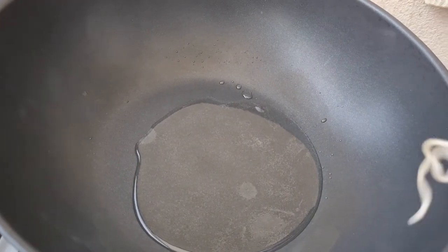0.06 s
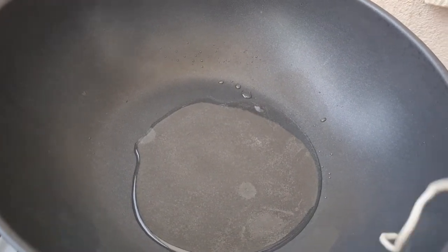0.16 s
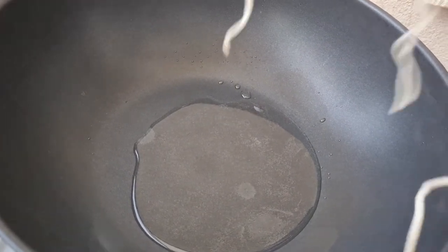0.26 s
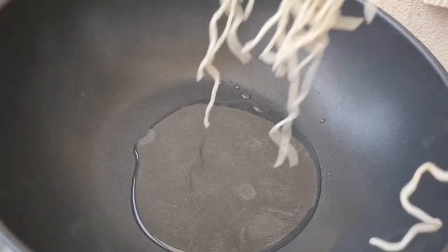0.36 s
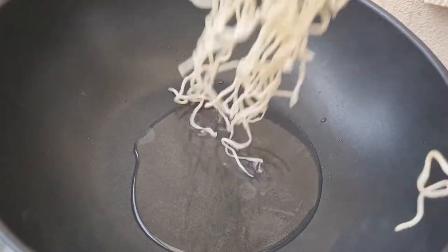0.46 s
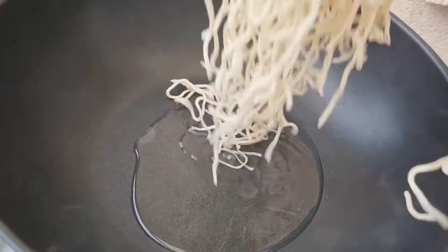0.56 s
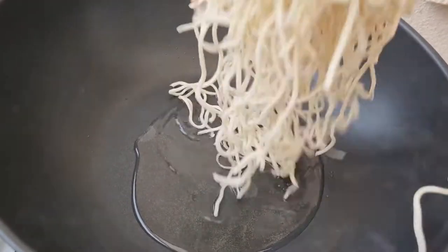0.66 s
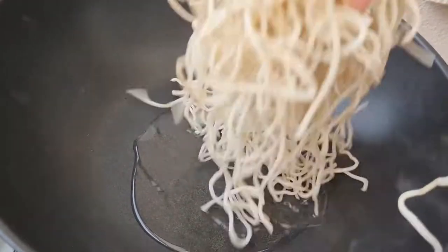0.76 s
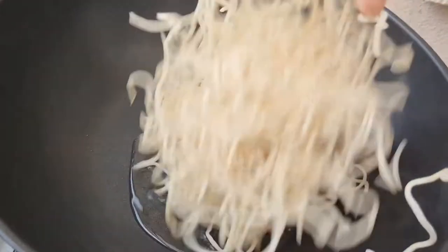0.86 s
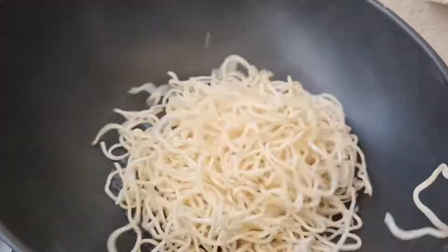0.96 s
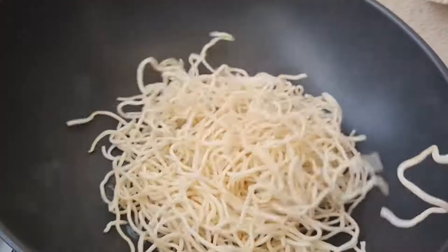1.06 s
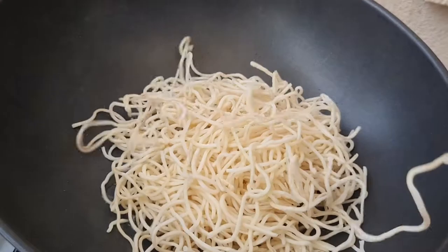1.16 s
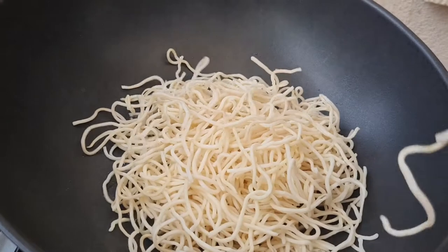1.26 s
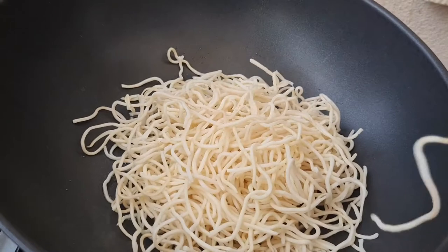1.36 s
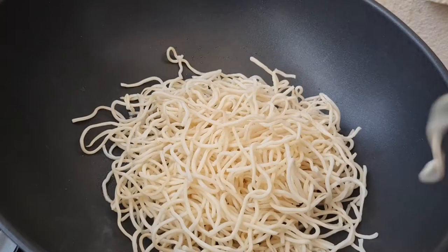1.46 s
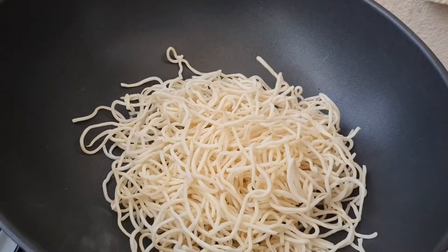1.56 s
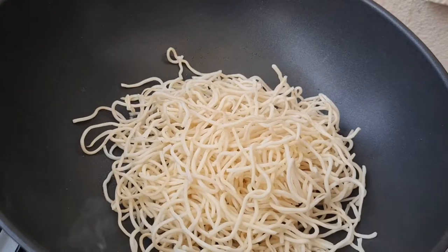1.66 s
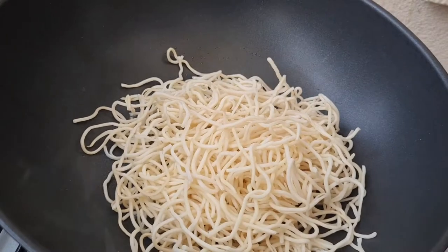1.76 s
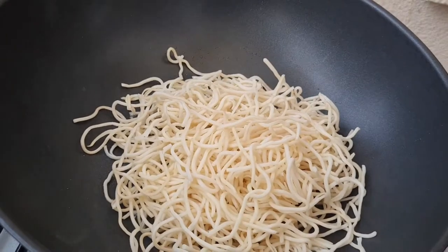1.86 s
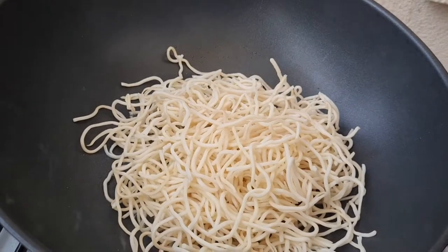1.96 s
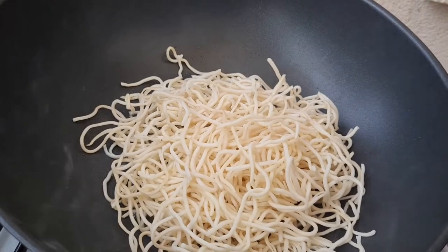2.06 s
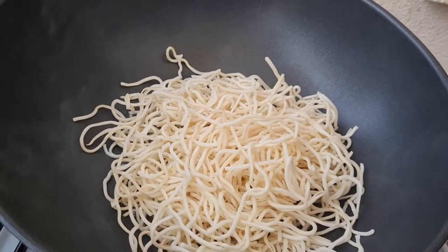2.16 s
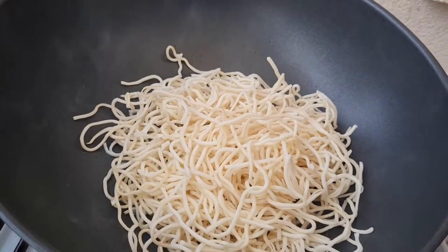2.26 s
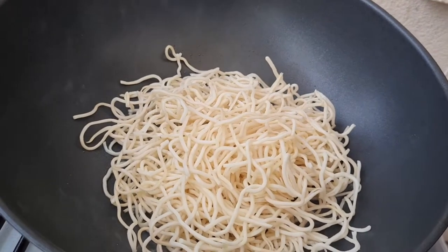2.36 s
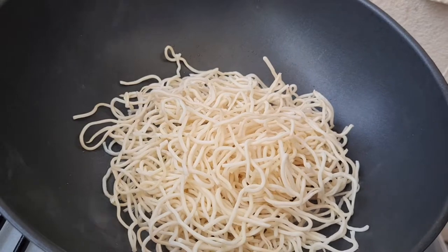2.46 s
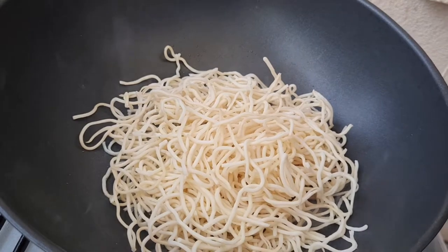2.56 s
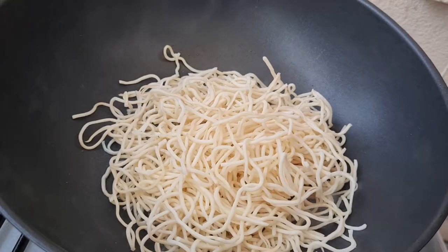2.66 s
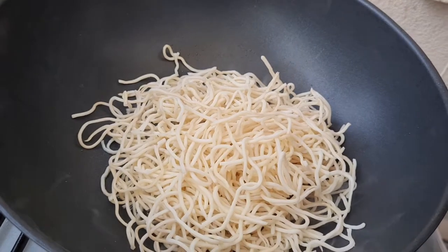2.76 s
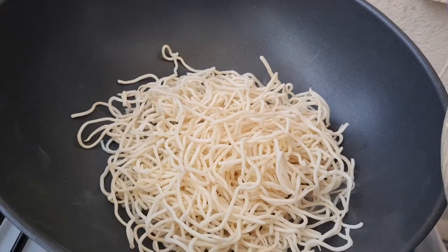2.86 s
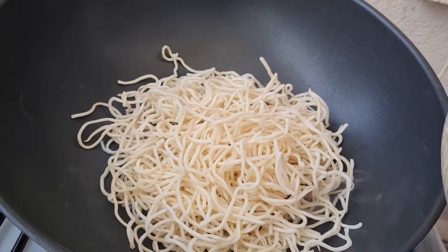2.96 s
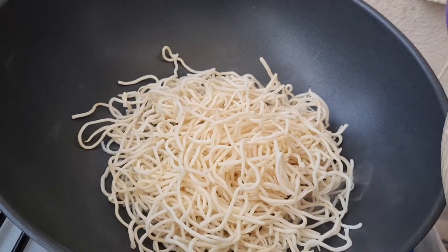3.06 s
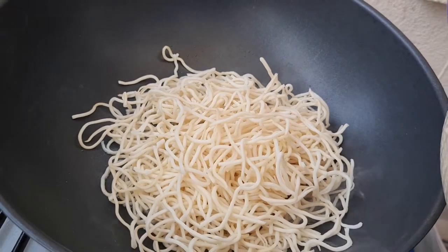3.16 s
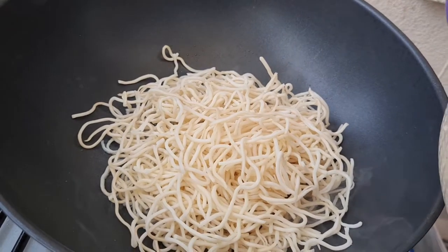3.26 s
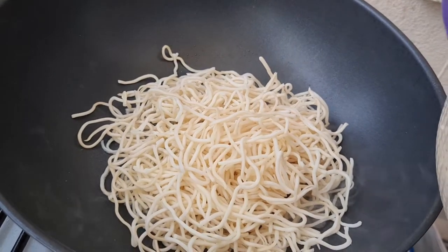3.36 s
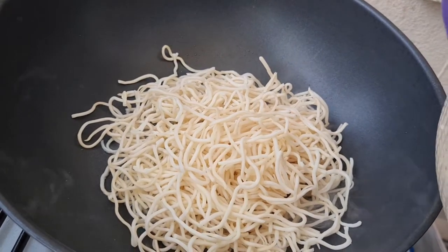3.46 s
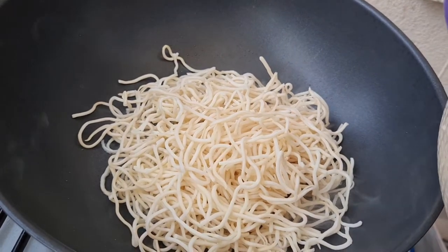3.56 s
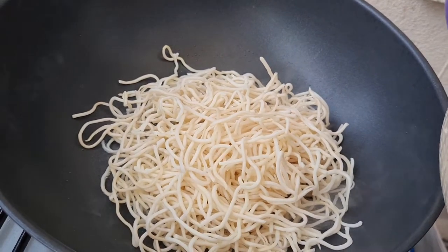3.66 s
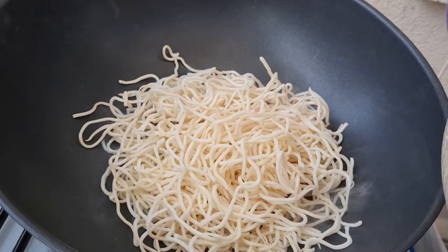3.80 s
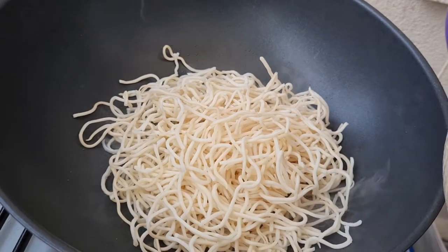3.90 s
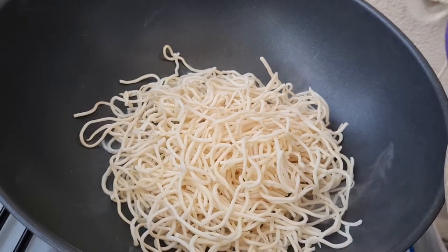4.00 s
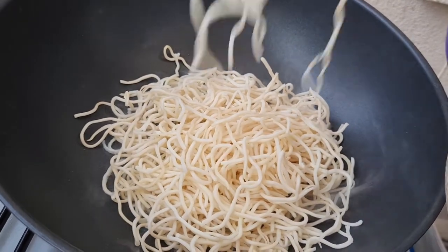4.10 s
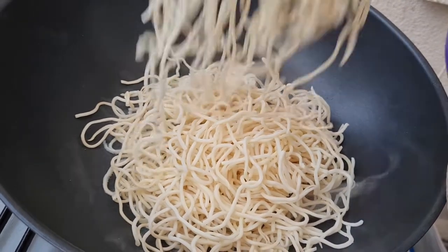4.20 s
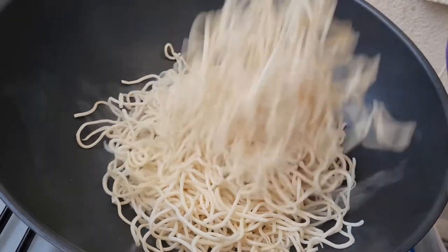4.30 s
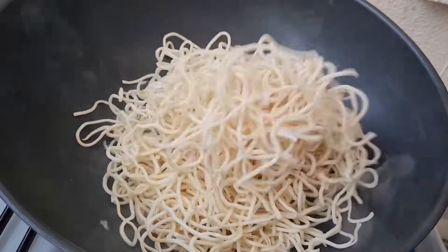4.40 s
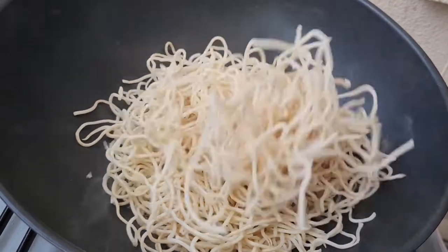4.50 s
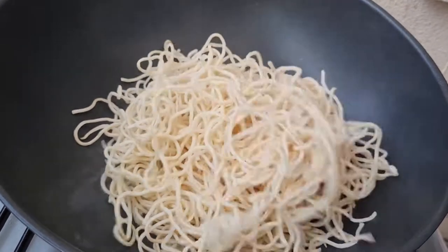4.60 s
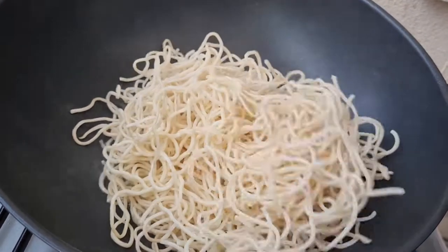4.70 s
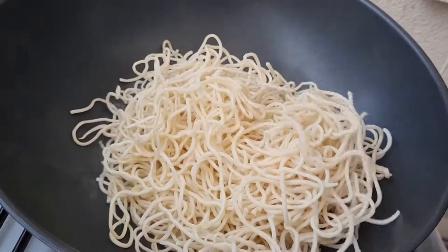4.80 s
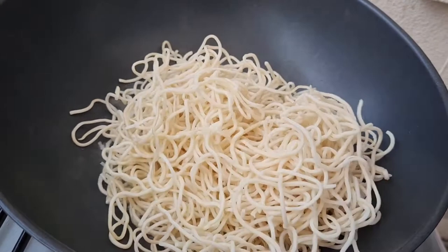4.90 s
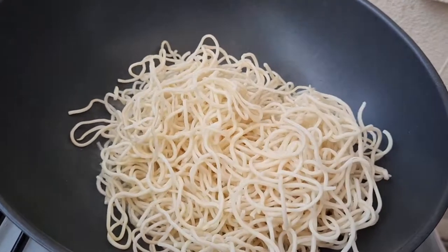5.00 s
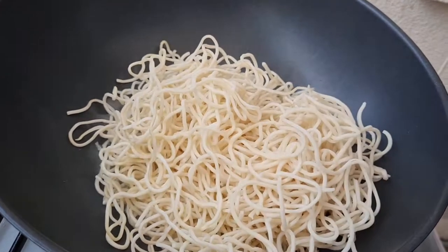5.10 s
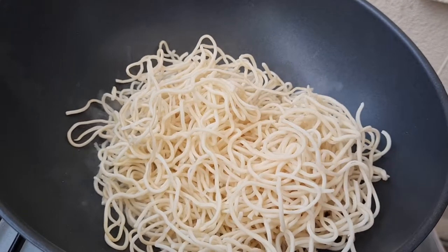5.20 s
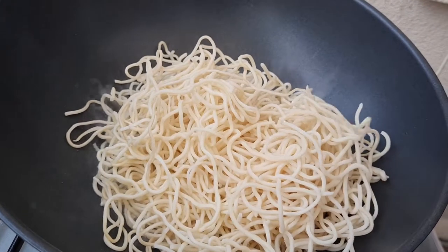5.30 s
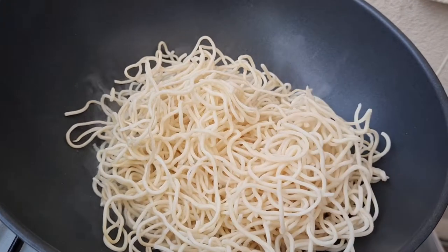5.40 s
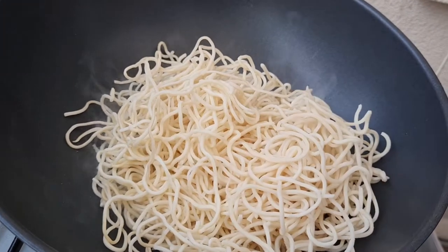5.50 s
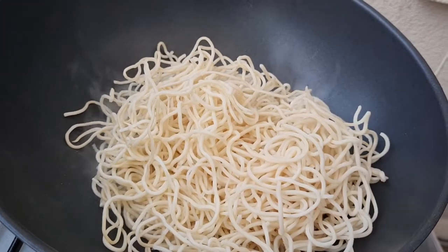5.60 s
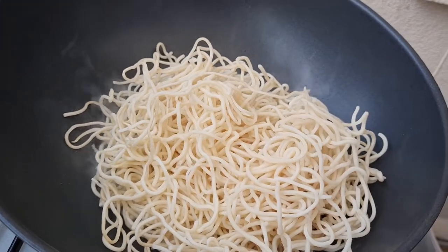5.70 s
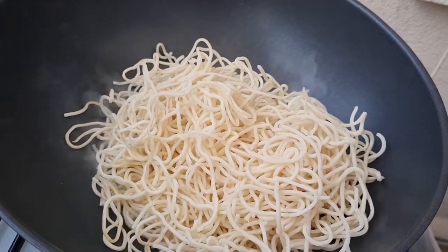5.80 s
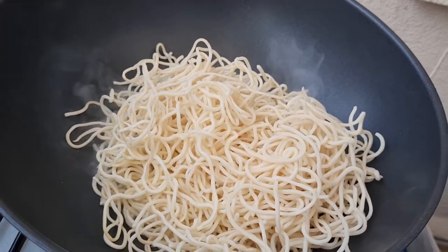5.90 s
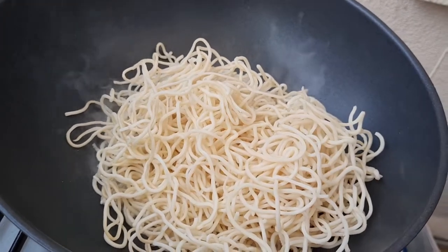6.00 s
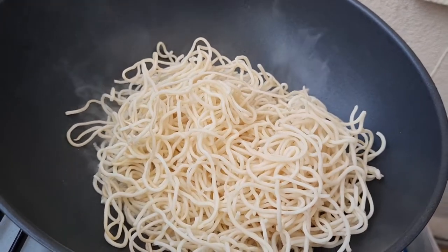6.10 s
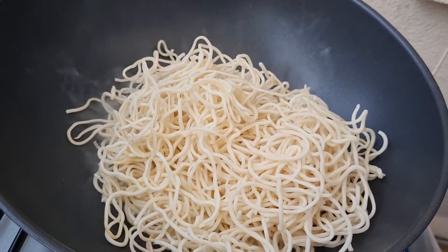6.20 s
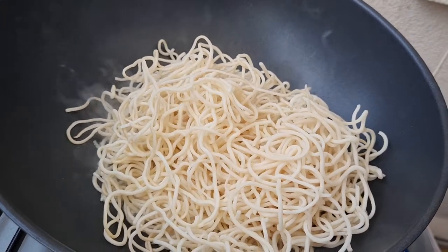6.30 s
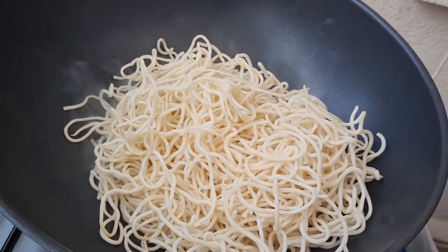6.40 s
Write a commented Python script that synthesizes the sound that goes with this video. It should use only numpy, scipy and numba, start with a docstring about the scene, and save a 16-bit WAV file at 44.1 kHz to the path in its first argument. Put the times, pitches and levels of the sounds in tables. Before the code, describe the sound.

Over the faint steady rush of a small kitchen, wet noodles rustle softly and land in a wok of hot oil with a sudden hiss. They settle into a bright, crackling sizzle with sharp spits of oil, small bubbling pops and brief squirts of steam. A second handful lands on top with soft wet slaps, and the sizzle swells a little and carries on. The microphone is close to the wok.

```python
"""Wet noodles fry in a wok, over the steady background rush of a small kitchen.
First the hanging strands rustle, and a brief soft hiss comes just before the landing.
Near 1 s they land in the hot oil and their water flashes to steam.
Then they fry: tiny steam bursts crackle, bubbles ring and pop under the heap, and the oil spits.
At 4.3 s a second handful lands on top and the sizzle swells; all along, the cooling oil dulls it."""
import sys
import numpy as np
from scipy import signal
from scipy.fft import rfft, irfft, next_fast_len
from scipy.io import wavfile
from numba import njit

SR = 44100
rng = np.random.default_rng(int(sys.argv[2]) if len(sys.argv) > 2 else 0)


def dump_mix(stems):
    """Bounce the given channels to the path in sys.argv[1] as a 16-bit WAV at rate SR."""
    frames = np.atleast_2d(stems).T  # one column per channel
    limited = np.clip(frames, -1, 1)  # hard clip at full scale
    pcm = np.round(limited * 32767).astype(np.int16)
    wavfile.write(sys.argv[1], SR, pcm)


N = 284445
TIME = np.arange(N) / SR


def from_db(db):
    """Amplitude ratio: tenfold for every 20 dB."""
    return 10 ** (np.asarray(db) / 20)


def rms_one(x):
    """Normalisation to unit mean power."""
    return x / np.sqrt(np.mean(x ** 2) + 1e-20)


def gain_at(spectrum, hz):
    """Frequency response, interpolated in dB over log frequency."""
    points_hz, db = np.transpose(spectrum)
    return from_db(np.interp(np.log(hz + 1e-9), np.log(points_hz), db))


def coloured(x, spectrum):
    """Zero-phase filtering: each frequency is scaled by the spectrum's gain."""
    size = np.shape(x)[-1]
    padded = next_fast_len(size, True)
    gain = gain_at(spectrum, np.fft.rfftfreq(padded, 1 / SR))
    return irfft(rfft(x, padded) * gain, padded)[..., :size]


def band(x, low_hz, high_hz):
    """Band-pass filtering between two edges."""
    sos = signal.butter(2, [low_hz, min(high_hz, SR / 2 - 1)], "band", fs=SR, output="sos")
    return signal.sosfilt(sos, x + 1e-18)


def drift(per_s):
    """Random modulation of rms 1: straight lines between Gaussian values."""
    points = rng.standard_normal(4096)
    return rms_one(np.interp(TIME * per_s, np.arange(len(points)), points))


def ring(drive, hz, cycles):
    """Damped resonance: the response falls by 60 dB in so many cycles."""
    radius = np.exp(-np.log(1000) * hz / (cycles * SR))
    angle = 2 * np.pi * hz / SR
    return signal.lfilter([.5, 0, -.5], [1, -2 * radius * np.cos(angle), radius ** 2], drive + 1e-18)


@njit
def bursts(starts, sizes, pitches, cycles, total):
    """Superposition of struck oscillators, each falling by 60 dB in so many cycles."""
    out = np.zeros(total)
    for k in range(len(starts)):
        length = cycles * SR / pitches[k]
        radius = np.exp(-np.log(1000.) / length)
        pull = 2 * radius * np.cos(2 * np.pi * pitches[k] / SR)
        last, before = sizes[k], 0.
        out[starts[k]] += last / 2
        for i in range(starts[k] + 1, min(starts[k] + int(length) + 3, total)):
            now = pull * last - radius * radius * before
            out[i] += (now - before) / 2
            last, before = now, last
    return out


def grains(spectrum, low_hz, high_hz, per_s, spread_db, largest_db, cycles):
    """Shot noise of rms 1: bursts at random times and pitches, many small and few large."""
    when, rank, sign, place = rng.random((int(per_s * N / SR), 4)).T
    db = np.minimum(-spread_db * np.log(1 - rank), largest_db)
    pitches = low_hz * (high_hz / low_hz) ** place
    sizes = from_db(db) * np.sign(sign - .5) * pitches * gain_at(spectrum, pitches)
    return rms_one(bursts((when * N).astype(np.int64), sizes, pitches, float(cycles), N))


def stereo_noise(spectrum, shared):
    """Partly coherent noise of rms 1: a share of its power is common to both sides."""
    common = np.sqrt(shared) * rng.standard_normal(N)
    own = np.sqrt(1 - shared) * rng.standard_normal((2, N))
    return rms_one(coloured(common + own, spectrum))


# Spectra of the steady noises. Each row: frequency in Hz, relative level in dB.
RUSH_SPECTRUM = [(25, -10), (52, -6), (85, -9), (130, -2.5), (185, -15.5), (240, -3), (400, -15.5),
                 (650, -3), (870, 4.5), (1130, -6.5), (1380, 2), (1720, -27.5), (2080, -22.5), (2800, -38)]
HISS_SPECTRUM = [(3000, -25), (3950, -19), (4400, -3.5), (5300, -2.5), (6400, -13), (7500, -7), (8370, -9),
                 (8850, -4.5), (9500, -16), (10300, -1), (11400, -15), (15500, -16)]
RUMBLE_SPECTRUM = [(25, -10), (42, 2), (52, 11.5), (64, 1), (76, 1.5), (95, -9), (118, 1), (170, -14.5),
                   (240, -25), (330, -28)]
# The rumble's envelope. Each row: time in seconds, relative level in dB.
RUMBLE_LEVELS = [(0, -82), (.8, -78), (1.6, -75.5), (3.6, -70.5), (4.1, -69), (5.0, -69.5), (5.4, -73),
                 (5.85, -65.5), (6.45, -75)]

def background():
    """Ambient noise, most coherent in the bass: an airy rush, a faint hiss and a rumble at the stove."""
    rush = from_db(-64.5) * stereo_noise(RUSH_SPECTRUM, shared=0.44) * from_db([[1.5], [-1.5]])
    hiss = from_db(-74) * stereo_noise(HISS_SPECTRUM, shared=0.051) * from_db([[2.5], [-2.5]])
    rumble_db = np.interp(TIME, *np.transpose(RUMBLE_LEVELS)) + 2.5
    return rush + hiss + from_db(rumble_db) * stereo_noise(RUMBLE_SPECTRUM, shared=0.86)


# Soft bumps. Each row: start in seconds, body level in dB, hold in seconds, body's upper edge in Hz.
LOW_THUDS = [(0.996, -59, 0.11, 332), (2.287, -54.5, 0.09, 148), (2.957, -56, 0.1, 168)]

def thuds():
    """Exponential decay of low noise: a rough edge fades at once, a dull body holds a moment first."""
    out = np.zeros(N)
    for start, db, hold_s, top_hz in LOW_THUDS:
        onset = np.clip((TIME - start) / 0.012, 0, 1)
        age = np.maximum(TIME - start, 0)
        release = np.exp(-np.maximum(age - hold_s, 0) / 0.085)
        body = release * rms_one(band(rng.standard_normal(N), 46, top_hz))
        edge = np.exp(-age / 0.036) * rms_one(band(rng.standard_normal(N), 220, 610))
        out += from_db(db) * onset * (body + from_db(2.5) * edge)
    return out


def reflections(t60, start_s):
    """Diffuse field: dying echoes of unit energy, different at each side except in the bass."""
    t = TIME[:SR // 3]
    own, common = rng.standard_normal((2, len(t))), rng.standard_normal(len(t))
    bass = signal.butter(1, 700, fs=SR)
    cloud = own - signal.lfilter(*bass, own) + signal.lfilter(*bass, common)
    cloud = cloud * np.exp(-np.log(1000) * t / t60) * (t > start_s)
    return cloud / np.linalg.norm(cloud, axis=1, keepdims=True)


# The left microphone faces the pan; the shaded right one hears mostly reflections, with this colour.
# Each row: frequency in Hz, gain in dB.
SHADE_RESPONSE = [(500, 0.5), (2000, 1.5), (5000, 2.5), (7600, 3.5), (8800, -4), (12000, -1.5),
                  (15500, -3.5)]

def heard(spot, echo_db=0):
    """Multipath propagation: direct sound, dull on the shaded right, plus echoes of wok and kitchen."""
    wok_walls = from_db(-6) * reflections(t60=0.021, start_s=0.00013)
    kitchen = from_db(-7) * reflections(t60=0.31, start_s=0.004)
    left, right = from_db(echo_db) * (wok_walls + kitchen)
    direct = signal.unit_impulse(len(left))
    delayed = np.roll(direct, rng.integers(0, 3))
    shaded = from_db(-5) * signal.lfilter(*signal.butter(2, 1700, fs=SR), delayed)
    paths = np.array([direct + left, shaded + coloured(right, SHADE_RESPONSE)])
    return signal.oaconvolve(spot[None], paths, axes=1)[:, :N]


# Resonances of the bowl. Each row: centre in Hz, bandwidth in Hz, gain in dB.
WOK_RESONANCES = [(236, 13, 5), (305, 11, 5.5), (950, 89, 3.5), (1124, 85, -5), (1330, 114, 1.5),
                  (2050, 44, 2), (6500, 390, -2.5), (6720, 36, 4.5), (7570, 85, 3), (8000, 270, 3.5)]

def wok(x):
    """Resonance and antiresonance: the bowl lifts or hollows narrow bands of the sound inside it."""
    return x + sum((from_db(db) - 1) * signal.lfilter(*signal.iirpeak(hz, hz / width, fs=SR), x)
                   for hz, width, db in WOK_RESONANCES)


# Hanging strands rustle; the last row is a brief soft hiss just before the landing.
# Each row: start in seconds, level in dB, decay time constant in seconds.
SOFT_RUSTLES = [(.16, -70, .05), (.54, -72, .04), (.655, -70, .02), (.797, -64, .02), (.813, -51.5, 0.03),
                (.864, -58.5, 0.031), (.91, -56, 0.015), (.917, -56, 0.026), (.944, -52, 0.032),
                (.964, -49, 0.017)]
# Their spectrum. Each row: frequency in Hz, relative level in dB.
RUSTLE_SPECTRUM = [(2000, -13), (2800, -12), (3600, -7), (4600, -1), (6000, -6), (8200, -8), (10000, -12),
                   (15000, -19)]

def rustles():
    """Amplitude-modulated noise: each soft rustle or hiss starts at once and fades in uneven grains."""
    envelope = np.zeros(N)
    for start, db, decay_s in SOFT_RUSTLES:
        age = np.maximum(TIME - start, 0)
        envelope += from_db(db) * np.minimum(age / 0.0027, 1) * np.exp(-age / decay_s)
    grainy = rng.standard_normal(N) * from_db(2.5 * drift(400))
    return envelope * rms_one(coloured(grainy, RUSTLE_SPECTRUM))


# Steam escaping the heap. Each row: peak time in seconds, level in dB, half-width in seconds, pitch in Hz.
STEAM_JETS = [(3.165, -36.5, 0.013, 8050), (3.659, -40, 0.009, 4000), (4.083, -42, .012, 3920),
              (4.267, -37.5, .01, 4100), (4.39, -38, 0.022, 8000), (5.262, -38, .009, 5800),
              (5.45, -34.5, 0.017, 5800), (5.68, -38, .014, 6500)]

def squirts():
    """Jet noise: steam squeezes between the strands in a sputtering hiss, pitched by the gap."""
    out = np.zeros(N)
    for peak_s, db, half_width_s, hz in STEAM_JETS:
        sputter = rng.standard_normal(N) * from_db(3.4 * drift(500))
        hiss = rms_one(band(sputter, hz / 1.4, hz * 1.4))
        out += from_db(db) * np.exp(-((TIME - peak_s) / half_width_s) ** 2) * hiss
    return out


# Large bubbles. Each row: start in seconds, level in dB, pitch in Hz.
LARGE_BUBBLES = [(1.362, -36, 2150), (1.38, -36, 2060), (1.418, -34, 2410), (1.467, -34, 2100),
                 (1.492, -36, 2060), (1.624, -33, 2040), (1.664, -32, 1890), (1.797, -32, 2090),
                 (2.148, -31, 2800), (2.182, -33, 2080), (2.352, -34, 2040), (2.374, -32, 1830),
                 (2.406, -37, 1520), (2.442, -35, 1510), (2.553, -32.5, 1830), (2.641, -28.5, 1880),
                 (3.583, -33.5, 2160), (3.637, -30, 1590), (4.692, -33, 2150), (4.786, -34, 2310),
                 (4.82, -36, 2420), (5.107, -35, 1740)]

def splutters(t60, rise, count):
    """Bubble resonance: a large bubble breaks into smaller ones, each ringing with a rising pitch."""
    out, t = np.zeros(N), TIME[:SR // 12]
    attack = np.minimum(t / 0.00045, 1)
    for start, db, hz in LARGE_BUBBLES:
        for k, (late, detune) in enumerate(rng.random((count, 2))):
            pitch = hz * (1 + 0.167 * min(k, 1) * (2 * detune - 1))
            tone = np.sin(2 * np.pi * pitch * t * (1 + rise * t / t60))
            envelope = attack * from_db(db - 3.3 * k - 60 * t / t60)
            at = round((start + 0.006 * k * late) * SR)
            out[at:at + len(t)] += (tone * envelope)[:N - at]
    return out


# Wet slaps and steam pockets in the heap.
# Each row: start in seconds, relative knock level in dB, pitch in Hz, smack level in dB.
STEAM_POCKETS = [(1.428, -24, 2750, -30), (1.514, -26, 3000, -27), (1.7764, -16.5, 980, -36),
                 (2.533, -29, 1200, -42), (2.5795, -22, 3000, -32), (2.604, -21, 2850, -30),
                 (2.91, -22, 3000, -31), (3.0042, -25, 2400, -28), (3.424, -29, 1300, -42),
                 (3.6523, -23, 3400, -28), (3.655, -19, 3000, -31), (3.888, -26.5, 1410, -40),
                 (4.2445, -18, 2500, -27), (4.454, -26, 950, -42), (4.585, -19, 1450, -38),
                 (4.5917, -12.5, 3500, -22), (4.6295, -14.5, 1600, -26), (4.642, -22, 2100, -34),
                 (4.645, -27, 2100, -27), (4.739, -23.5, 1450, -42), (4.8238, -23, 2400, -26),
                 (5.027, -28, 1250, -42), (5.0587, -30, 3000, -26), (5.1185, -16, 2320, -26),
                 (5.4148, -28, 925, -40), (5.4512, -24, 3900, -27), (5.5559, -17, 3600, -27),
                 (5.6126, -18, 2200, -28), (5.7003, -22, 1300, -28), (5.837, -26, 1300, -42),
                 (6.116, -23, 1260, -25), (6.1518, -18.5, 1310, -33), (6.155, -24, 2400, -29),
                 (6.1999, -30, 3000, -28)]

def plops():
    """Heavy damping: a pocket opens with a knock of about two cycles, an overtone and a wet smack."""
    out, t = np.zeros(N), TIME[:SR // 16]
    click = signal.unit_impulse(len(t))
    for start, knock_db, hz, smack_db in STEAM_POCKETS:
        overtone = 0.23 * ring(click, hz * rng.uniform(1.17, 1.66), cycles=5.4)
        knock = band(ring(click, hz, cycles=2.3) + overtone, 380, 2.3 * hz)
        smack = rms_one(band(rng.standard_normal(len(t)), 2800, 5800)) * np.exp(-t / 0.0014)
        at = round(start * SR)
        out[at:at + len(t)] += (from_db(knock_db + 4.5) * knock + from_db(smack_db) * smack)[:N - at]
    return out


# The landing: two slaps, a gush and a lingering fizz.
# Each row: start in seconds, relative level in dB, decay in dB per second.
LANDING_STAGES = [(.9772, -21.5, 900), (.9812, -21, 1200), (.9775, -21, 290), (.9775, -44.5, 16)]
# Spectrum of the steam. Each row: frequency in Hz, relative level in dB.
STEAM_SPECTRUM = [(500, -23.5), (1000, -21), (2000, -20.5), (3000, -18), (3600, -8), (4400, 0),
                  (6000, -0.5), (7600, 4), (9300, -5.5), (12000, -7), (15500, -9.5)]

def steam_flash():
    """Flash boiling: the wet heap meets the oil, and the bursts of steam noise add in power."""
    power = np.zeros(N)
    for start, db, decay_db_per_s in LANDING_STAGES:
        age = np.maximum(TIME - start, 0)
        attack = np.minimum(age / 0.001, 1)
        power += (attack * from_db(db - decay_db_per_s * age)) ** 2
    fizz = coloured(rng.standard_normal(N) * from_db(4.7 * drift(500)), STEAM_SPECTRUM)
    return from_db(-1.5) * np.sqrt(power) * rms_one(fizz)


# Handfuls heat up, then dry. Each row: start in seconds, relative crackle and bubbling levels in dB,
# heating time constant in seconds, drying in dB per second.
NOODLE_HANDFULS = [(1.03, -36.5, -44.5, 0.15, 0.3643), (4.3, -38, -42.5, 0.14, 5)]
# Pockets of water reach the oil and the sizzle flares.
# Each row: start in seconds, relative crackle and bubbling levels in dB, hold in seconds.
WATER_FLARES = [(0.993, -46.5, -53.5, 0.072), (1.407, -48, -55, 0.078), (1.595, -48, -51, 0.042),
                (1.768, -43, -65, 0.085), (1.931, -31.5, -48, 0.043), (2.007, -39, -57, 0.11),
                (2.337, -33, -51, 0.032), (2.63, -42, -45.5, 0.053), (3.1, -52, -58, 0.051),
                (3.473, -50, -60, 0.056), (3.727, -38, -49, .03), (4.125, -37, -62, 0.037),
                (4.358, -38.5, -43, 0.091), (4.619, -37, -39, 0.041), (4.74, -38, -44, 0.11),
                (5.008, -34.5, -55, 0.05), (6.107, -39.5, -44, 0.036)]
# The sizzle dips briefly. Each row: centre in seconds, gain in dB.
SIZZLE_DIPS = [(1.88, -1), (3.26, -6.5), (3.68, -3.5), (3.99, -3), (5.17, -1.5)]

def vigour():
    """Incoherent sources add in power: handfuls and flares set the envelopes of crackle and bubbling."""
    power = np.zeros((2, N))
    lag = 2.27  # the water under the heap takes this many times as long to heat
    for start, crackle_db, bubbling_db, heating_s, drying_db_per_s in NOODLE_HANDFULS:
        age = np.maximum(TIME - start, 0)
        heated = 1 - np.exp(-age / [[heating_s], [heating_s * lag]])
        wetness = from_db(-drying_db_per_s * age)
        power += (heated * wetness * from_db([[crackle_db], [bubbling_db]])) ** 2
    for start, crackle_db, bubbling_db, hold_s in WATER_FLARES:
        attack = np.clip((TIME - start) / 0.0058, 0, 1)
        release = np.exp(-np.maximum(TIME - start - hold_s, 0) / 0.011)
        power += (attack * release * from_db([[crackle_db], [bubbling_db]])) ** 2
    dips_db = sum(db * np.exp(-((TIME - centre) / 0.029) ** 2) for centre, db in SIZZLE_DIPS)
    return np.sqrt(power) * from_db(dips_db)


def cooled(x, above_hz, db_per_s, neutral_at_s=3.48):
    """Spectral tilt: cooler oil boils the water less violently, so the treble sinks steadily."""
    low = signal.sosfilt(signal.butter(1, above_hz, fs=SR, output="sos"), x + 1e-18)
    return low + (x - low) * from_db(-db_per_s * (TIME - neutral_at_s))


# Spectrum of the bubbles. Each row: frequency in Hz, relative level in dB.
BUBBLE_SPECTRUM = [(230, -10.5), (380, -17), (480, -4.5), (750, -6), (940, -4), (1130, -5.5), (1290, 3),
                   (1700, 1.5), (2050, 5), (2900, 3), (3800, -7.5)]

def bubbling():
    """Bubble resonance: many simmer under the heap, and a few ring longer as a gurgle."""
    simmer = grains(BUBBLE_SPECTRUM, 217.6, 3990, per_s=520, spread_db=4, largest_db=15.5, cycles=18.6)
    gurgle = grains(BUBBLE_SPECTRUM, 1195, 3260, per_s=9, spread_db=1.5, largest_db=6, cycles=36)
    return rms_one(simmer + from_db(-10.5) * gurgle)


# Spectrum of the tiny steam bursts. Each row: frequency in Hz, relative level in dB.
CRACKLE_SPECTRUM = [(1500, -38), (2500, -2.5), (4000, 1), (6500, -4), (8000, -28), (9000, -3.5),
                    (11000, -0.5), (15500, 5)]

def crackle():
    """Modulated shot noise: water flashes to steam in flurries of ticks, the largest softly limited."""
    flurry = from_db(2.53 * drift(60) + 2 * drift(450))
    ticks = grains(CRACKLE_SPECTRUM, 2380, 15240, per_s=1400, spread_db=4.5, largest_db=18, cycles=4.43)
    ceiling = from_db(29)
    return rms_one(ceiling * np.tanh(rms_one(flurry * ticks) / ceiling))


def small_spits(crackling, per_s=26, landing_s=0.977):
    """A random point process: rows of lesser spits whose strength follows the crackle's envelope."""
    count = int(per_s * (TIME[-1] - landing_s))
    starts = rng.uniform(landing_s, TIME[-1], count)
    size, pitch, spray = rng.standard_normal((count, 3)).T
    crackle_db = 20 * np.log10(np.interp(starts, TIME, crackling) + 1e-9)
    return list(zip(starts, crackle_db + 27.5 + 0.9 * size, 11400 + 1740 * pitch, -10 + 2 * spray))


# The loudest spits of oil.
# Each row: start in seconds, relative crack energy in dB, pitch in Hz, relative spray energy in dB.
LOUD_SPITS = [(1.349, -4.9, 11900, -4), (1.4729, -6.0, 12400, 2), (1.4834, -5.0, 12800, 2),
              (1.5137, -5.2, 9700, -12), (1.5913, -2.5, 12400, 0), (1.6003, -5.0, 12700, 1),
              (1.6602, -4.6, 12300, 2), (1.6655, -3.0, 12100, -12), (1.7518, -4.7, 12500, -5),
              (1.7766, 0.0, 10600, -7), (1.8204, -0.8, 12800, -4), (1.9218, -4.9, 12300, -2),
              (1.9479, -0.9, 10500, 0), (1.9634, -1.1, 11500, -4), (2.0098, -4.1, 13000, -12),
              (2.0328, -5.6, 10300, -12), (2.1204, -5.4, 10900, -12), (2.1345, -4.5, 12800, -12),
              (2.2055, -5.1, 12100, -12), (2.3035, -2.6, 12000, -12), (2.3703, 0.4, 11700, -5),
              (2.5417, -3.2, 12000, -3), (2.6199, -5.9, 12600, -1), (2.7385, -3.9, 11800, -9),
              (2.8432, -5.3, 12300, -12), (3.0041, -3.2, 10700, -10), (3.0578, -5.2, 11900, -12),
              (3.1114, -7.0, 11000, -2), (3.1396, -3.2, 11200, -12), (3.1645, -3.0, 9400, -12),
              (3.2024, -5.2, 10100, -6), (3.2401, -6.8, 12700, -12), (3.3213, -6.3, 11600, -12),
              (3.3898, -1.9, 10400, -12), (3.4698, -3.8, 13600, -1), (3.4799, -4.4, 8900, -12),
              (3.4953, -5.8, 11100, -10), (3.5127, -6.7, 12100, 2), (3.5229, -4.2, 11300, -12),
              (3.7119, -6.8, 11400, -3), (3.8065, -4.9, 11300, -1), (3.8198, -6.5, 10400, -9),
              (3.9199, -2.0, 12800, -10), (3.9385, -6.8, 12600, -6), (4.0306, -7.0, 10700, -12),
              (4.0481, -4.3, 10200, -12), (4.1196, -7.0, 11200, 1), (4.193, -3.2, 12000, -5),
              (4.2909, -6.0, 10800, -5), (4.3073, -5.4, 11200, -12), (4.3662, -6.7, 11000, 2),
              (4.3733, -4.5, 10500, -6), (4.4943, -4.3, 11400, -1), (4.5916, -3.1, 8100, -5),
              (4.6543, -3.7, 10000, -12), (4.7543, -1.5, 10300, -3), (4.7603, -5.0, 11400, 2),
              (4.9298, -6.9, 11200, 0), (4.9712, -7.3, 8200, -12), (5.0587, -1.0, 9500, -8),
              (5.0862, -4.5, 11400, -12), (5.1112, -5.9, 9900, -12), (5.1919, -3.7, 11900, -1),
              (5.2048, -7.3, 11400, -12), (5.4175, -6.9, 11600, -2), (5.5559, 0.5, 11600, -4),
              (5.5684, -2.5, 10100, -5), (5.6122, -1.5, 10100, -2), (5.6239, -2.4, 11000, -3),
              (5.8759, -7.4, 11600, -12), (5.9003, -3.5, 11400, -2), (5.982, -5.3, 11400, -6),
              (6.011, -5.5, 10800, -4), (6.0606, -5.5, 10400, -6), (6.1389, -6.3, 11500, -6),
              (6.1554, -7.6, 11200, -12), (6.1999, -5.0, 11100, -8)]

def spits(rows, crack_s, spray_s):
    """Impulsive excitation: a droplet bursts with a crack, pitched by its size, then throws a spray."""
    out, t = np.zeros(N), TIME[:SR // 16]
    treble = signal.butter(1, 6500, "high", fs=SR)
    for start, db, hz, spray_db in rows:
        burst, hiss, grain = signal.lfilter(*treble, rng.standard_normal((3, len(t))))
        crack = band(burst * np.exp(-t / crack_s), 1080, 18400)
        crack = crack + 1.9 * ring(crack, hz, cycles=5.4)
        spray = band(hiss * grain * np.exp(-t / spray_s), 2600, SR / 2)
        spit = crack / np.linalg.norm(crack) + from_db(spray_db - 9) * spray / np.linalg.norm(spray)
        at = round(start * SR)
        out[at:at + len(t)] += from_db(db - 0.48) * spit[:N - at]
    return out


def scene():
    """A distributed source: several spots of the pan fry, each with its own paths to the microphones."""
    spots = 8
    crackling, boiling = vigour()
    droplets = list(LOUD_SPITS) + small_spits(crackling)
    pan = heard(plops(), echo_db=-5)  # on top of the heap, clear of the walls, plops sound dry
    pan += heard(rustles() + squirts() + splutters(t60=0.03, rise=0.012, count=3))
    for k in range(spots):
        ticks = from_db(2) * crackling * cooled(crackle(), above_hz=9700, db_per_s=1.3)
        bubbles = from_db(-0.7) * boiling * cooled(bubbling(), above_hz=3000, db_per_s=3)
        cracks = spits(droplets[k::spots], crack_s=0.00005, spray_s=0.014)
        pan += heard((ticks + bubbles + steam_flash()) / np.sqrt(spots) + cracks)
    return wok(pan) + thuds() * from_db([[1.5], [-1.5]]) + background()


def record(dry):
    """Band limiting: a steep low-pass filter cuts the highest treble."""
    return signal.sosfilt(signal.ellip(12, 0.1, 80, 15650, fs=SR, output="sos"), dry)


dry = scene()
out = record(dry)
dump_mix(out)
```